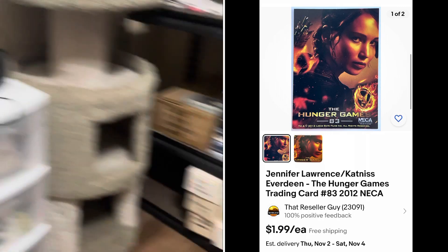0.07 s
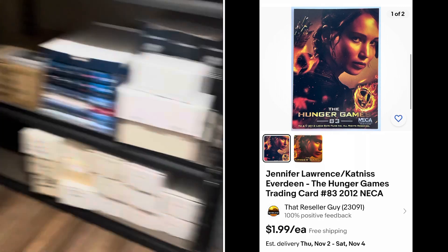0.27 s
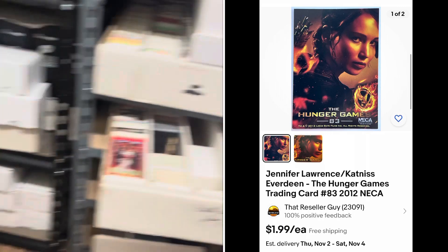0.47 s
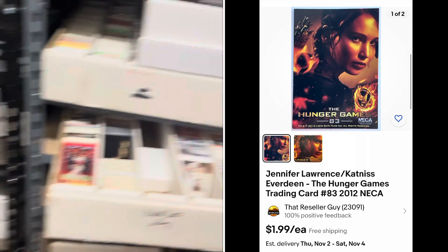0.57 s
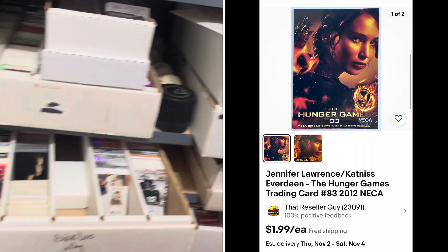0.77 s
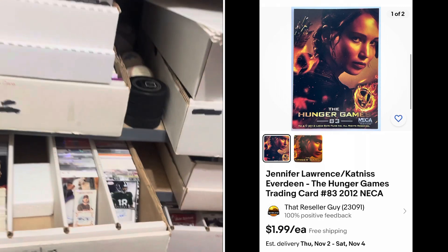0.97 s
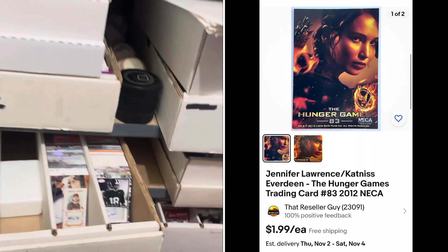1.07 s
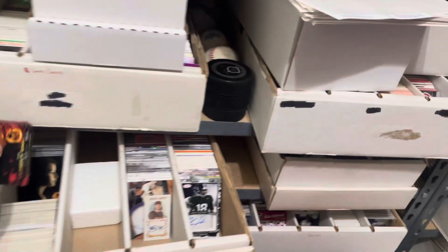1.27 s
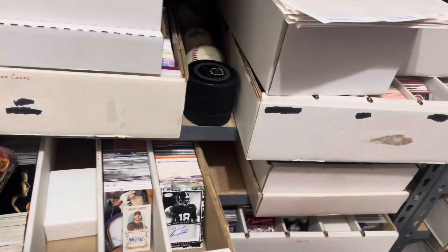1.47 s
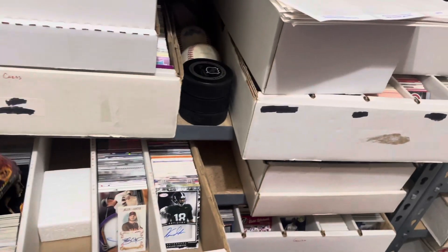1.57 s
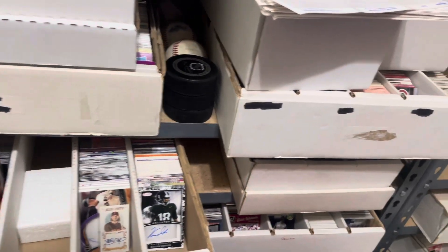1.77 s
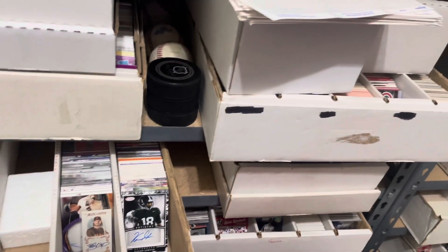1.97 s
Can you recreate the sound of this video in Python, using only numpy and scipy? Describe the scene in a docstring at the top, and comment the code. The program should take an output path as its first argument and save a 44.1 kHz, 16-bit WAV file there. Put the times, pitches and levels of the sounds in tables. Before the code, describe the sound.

A swivel office chair rolls across a hard floor, squeaking faintly, before a loud close knock.

```python
"""A small room with a hard floor: a swivel office chair is pushed off and rolls, its casters made of dense
tiny impacts that rumble, rattle, scrape and bump. A low squeak near 480 Hz, a wavering sine, comes and goes
as it slows. Something slides with a rising rustle of grainy noise and a tick, among soft handling taps; then
a hard object knocks down close to the microphone, ringing modes and noise bursts, and overloads it.
Room tone and a thin hiss, both shaped noise, lie behind."""
import sys
import numpy as np
from scipy import signal
from scipy.fft import rfft, irfft, next_fast_len
from scipy.io import wavfile
from scipy.ndimage import uniform_filter1d, minimum_filter1d, map_coordinates

SR = 44100
rng = np.random.default_rng(int(sys.argv[2]) if len(sys.argv) > 2 else 0)


def store_wav(level_fs):
    """Save 16-bit WAV to argv[1]."""
    pcm = np.round(np.clip(np.atleast_2d(level_fs), -1, 1) * 32767)
    wavfile.write(sys.argv[1], SR, pcm.T.astype(np.int16))


N = 88640  # samples

PATCHY_DB = 3  # rms depth of the flicker in the rattle and the scrape


def amp(db):
    """Decibels to gain."""
    return 10 ** (np.asarray(db) / 20)


def unit(x):
    """Scale to rms 1."""
    return x / np.sqrt(np.mean(x ** 2) + 1e-20)


def clock():
    """Time of each sample in seconds."""
    return np.arange(N) / SR


def along(points, hz):
    """Read (Hz, value) points at hz, on a log frequency axis."""
    point_hz, values = np.transpose(points)
    return np.interp(np.log(hz + 1), np.log(point_hz + 1), values)


def level(rows):
    """Gain per sample from (s, dB) rows."""
    return amp(np.interp(clock(), *np.transpose(rows)))


def wobble(rate):
    """A smooth random curve with rate knots a second."""
    knots = rng.standard_normal(int(N * rate / SR) + 4)
    return map_coordinates(knots, [clock() * rate])


def filtered(x, response):
    """x times a response of frequency."""
    size = next_fast_len(N + SR // 2)
    hz = np.fft.rfftfreq(size, 1 / SR)
    return irfft(rfft(x, size) * response(hz), size)[:N]


def coloured(x, spectrum):
    """x filtered by the given spectrum, at rms 1."""
    return unit(filtered(x, lambda hz: amp(along(spectrum, hz))))


def noise(spectrum):
    """Smooth coloured noise at rms 1."""
    return coloured(rng.standard_normal(N), spectrum)


def burst(s, attack, hold, t60):
    """Envelope from time s: linear attack, hold, exponential release."""
    t = clock() - s
    release = amp(-60 * np.maximum(t - attack - hold, 0) / t60)
    return np.clip(t / attack, 0, 1) * release


def mode(s, attack, hz, t60):
    """A decaying sine struck at time s."""
    return burst(s, attack, 0, t60) * np.sin(2 * np.pi * hz * (clock() - s))


def swell(s, length):
    """A rounded rise and fall."""
    return np.sin(np.pi * np.clip((clock() - s) / length, 0, 1))


def patchy(x, depth_db):
    """Make patches of time and frequency come and go at random."""
    z = signal.stft(x, nperseg=512)[2]
    field = rng.standard_normal(z.shape)
    field = uniform_filter1d(field, size=5, axis=0)  # over frequency bins
    field = uniform_filter1d(field, size=8, axis=1)  # over time frames
    return unit(signal.istft(z * amp(depth_db * unit(field)), nperseg=512)[1][:N])


def grains():
    """Rough contact as dense tiny impacts of uneven size."""
    grains_per_s, spread_db = 6000, 1.5
    size = amp(spread_db * np.minimum(rng.exponential(size=N), 4))
    hit = rng.random(N) < grains_per_s / SR
    return hit * size * rng.standard_normal(N)


def frame(x):
    """The chair's frame adds its resonances to what shakes it."""
    # frame resonances: centre_hz, width_hz, gain_db
    resonances = [(470,26,6),(935,12,2.5),(1730,170,-21)]

    def response(f):
        return 1 + sum(amp(db) * 1j * f * w / (c * c - f * f + 1j * f * w) for c, w, db in resonances)
    return filtered(x, response)


def casters():
    """Wheels run over the grain of the floor: a rumble, the floor's low drumming and a plastic rattle."""
    # rumble of the rolling: time_s, level_db (before the trim)
    roll_levels = [(.1,-61.5),(.22,-53.5),(.294,-40.5),(.35,-25),(.45,-25.5),(.572,-30.5),(.65,-29),(.72,-31.5),(.87,-36.5),(.92,-32.5),(.99,-36.5),(1.12,-36.5),(1.19,-41),(1.29,-38),(1.37,-51),(1.42,-43),(1.48,-46.5),(1.85,-54)]
    # rumble spectrum: freq_hz, relative density_db
    rumble_colour = [(30,-49),(70,-25),(115,-11.5),(165,0),(240,-4.5),(380,-4.5),(640,-6),(1000,-10),(1500,-24.5),(3000,-49.5)]
    # drumming of the floor under the wheels: time_s, level_db
    drum_levels = [(.15,-75),(.28,-51),(.36,-38),(.65,-47.5),(.82,-46),(1.12,-44),(1.42,-45.5),(1.58,-46),(1.8,-59.5),(2,-60)]
    # drumming spectrum: freq_hz, relative density_db
    drum_colour = [(25,-28),(50,-16),(70,-8.5),(100,13),(125,-3.5),(170,-13),(300,-35),(1000,-70)]
    # caster rattle: time_s, level_db (before the trim)
    rattle_levels = [(.2,-58),(.3,-47.5),(.385,-34.5),(.40,-27.5),(.44,-29.5),(.485,-27.5),(.54,-31),(.565,-28.5),(.64,-30.5),(.672,-25.5),(.705,-31.5),(.74,-41),(.85,-46),(.97,-45.5),(1.15,-52),(1.65,-52.5),(1.8,-65)]
    # rattle spectrum: freq_hz, relative density_db
    rattle_colour = [(200,-18),(800,-0.5),(1500,4.5),(1950,10.5),(2350,0.5),(2650,2.5),(3000,-4.5),(3400,0.5),(4000,-11),(5200,-12),(7000,-25.5),(12000,-39)]
    roll_trim_db, rattle_trim_db = -2.5, -1

    # both levels waver: depth in dB, knots a second
    roll_gain = level(roll_levels) * amp(roll_trim_db + 1.47 * wobble(29.23))
    rumble = roll_gain * coloured(frame(grains()), rumble_colour)
    drum = level(drum_levels) * noise(drum_colour)
    rattle_gain = level(rattle_levels) * amp(rattle_trim_db + .8 * wobble(68.3))
    rattle = rattle_gain * patchy(coloured(frame(grains()), rattle_colour), PATCHY_DB)
    return rumble + drum + rattle


def scrape():
    """The casters drag sideways as they swing round after the push, before they line up."""
    # scrape: time_s, level_db
    scrape_levels = [(.36,-80),(.385,-42),(.397,-27.5),(.43,-35.5),(.455,-26.5),(.485,-34.5),(.52,-43),(.58,-53),(.7,-47),(.8,-82)]
    # scrape spectrum: freq_hz, relative density_db
    scrape_colour = [(500,-34),(1500,10.5),(2000,-9),(3000,5),(4500,-2.5),(6000,-13),(7500,-26),(12000,-47)]
    return level(scrape_levels) * patchy(coloured(grains(), scrape_colour), PATCHY_DB)


def bumps():
    """Each jolt rings the chair, thuds through the frame and shakes the loose casters."""
    # caster bumps: start_s, attack_s, thud_db, rattle_db
    jolts = [(.348,0.0023,-24,-46),(.372,0.0033,-33.5,-49),(0.893,0.0082,-36,-32.5),(1.105,0.0051,-38,-50),(1.208,0.0015,-43,-37),(1.299,0.00087,-39,-49.5),(1.326,0.0038,-49,-46),(1.395,0.016,-42,-48.5)]
    # what a jolt rings in the chair: freq_hz, level_db (relative to the jolt), t60_s
    jolt_modes = [(130,-2,0.17),(173,-3,0.12),(371,-8,0.07),(702,-14,0.038)]
    # thud spectrum: freq_hz, relative density_db
    thud_colour = [(30,-40),(70,-41),(130,0.5),(250,-5.5),(500,-2),(1000,-12),(2500,-52.5)]
    # spectrum of the shaken casters: freq_hz, relative density_db
    clatter_colour = [(200,-5),(850,0),(1400,-1),(2150,1.5),(2500,-11.5),(3400,-17),(5000,-17),(7000,-28),(14000,-45)]
    ring_over_thud_db, hold_s, t60_s = 0.5, 0.013, 0.13

    thud = coloured(frame(grains()), thud_colour)
    clatter = coloured(frame(grains()), clatter_colour)
    out = np.zeros(N)
    for s, attack, thud_db, rattle_db in jolts:
        ring = sum(amp(db) * mode(s, attack, hz, t60) for hz, db, t60 in jolt_modes)
        shaken = amp(thud_db) * thud + amp(rattle_db) * clatter
        out += amp(thud_db + ring_over_thud_db) * ring
        out += burst(s, attack, hold_s, t60_s) * shaken
    return out


def squeak():
    """A rubbing bearing sings in short wavering swells."""
    # swells of the squeak: start_s, length_s, pitch_hz (mean), level_db (before the trim)
    squeak_swells = [(0.312,0.026,475,-32),(.345,0.021,490,-23.5),(0.408,0.026,495,-24.5),(0.483,0.056,490,-27.5),(0.546,0.075,485,-31.5),(0.599,0.078,492,-24.5),(0.678,0.078,462,-25.5),(0.72,0.072,485,-30),(0.781,0.092,490,-39.5),(0.882,0.058,482,-28.5),(1.034,0.14,482,-33),(1.218,0.049,486,-31),(1.3,0.022,472,-28.5),(1.391,0.043,464,-36)]
    pitch_waver = 0.0116  # fraction of the pitch
    rough_db, trim_db = 1.4, -1
    swell_power = 0.73  # below 1 rounds the swell out fuller

    out = np.zeros(N)
    for s, length, hz, db in squeak_swells:
        pitch = hz * (1 + pitch_waver * wobble(90))
        phase = 2 * np.pi * np.cumsum(pitch) / SR
        shape = np.abs(swell(s, length)) ** swell_power
        out += amp(db) * shape * np.sqrt(2) * np.sin(phase)
    return out * amp(trim_db + rough_db * wobble(150))


def knock():
    """A hard object lands in quick contacts; each rings its modes, dense body and a crack, with little bass."""
    # contacts of the knock: start_s, ring_db, body_db, crack_db
    contacts = [(1.9081,-15.5,-8,-25),(1.9207,-16.5,-9,-36),(1.931,-16.5,-8,-7),(1.9358,-13,-12.5,-14)]
    # what the knocked object rings with: freq_hz, relative level_db (before scatter), t60_s
    knock_modes = [(236,-4,0.096),(301,-4.5,0.13),(360.2,-5.5,0.15),(424,-12,0.061),(566,-6,0.081),(624.5,-8,0.14),(656,-6.5,0.16),(786,-5,0.09),(880,-7.5,.12),(1105,1.5,0.18),(1177,-3,0.17),(1217,2,0.1),(1264,-1.5,0.075),(1414,-4.5,0.096),(1617,-12,0.17),(1857,-8.5,0.088),(2050,-7.5,0.14),(2430,-14,0.17),(2524,-15,.2),(2860,-16,0.21),(3336,-12,0.18),(3590,-25,.18),(4160,-20,0.24)]
    # body spectrum: freq_hz, relative density_db
    body_colour = [(40,-40),(110,-28),(220,-0.5),(550,2),(900,-8),(1220,5.5),(1600,-1.5),(2000,-4.5),(2250,-35),(2800,-8),(4500,-16.5),(7000,-27.5),(14000,-51)]
    # crack spectrum: freq_hz, relative density_db
    crack_colour = [(300,-11),(1500,6.5),(2250,1),(2800,1),(3500,-4.5),(5000,-7),(7000,-17),(10000,-36),(15000,-33)]
    attack_s, body_t60_s = .0008, 0.1
    crack_attack_s, crack_hold_s, crack_t60_s = .002, 0.0016, 0.028
    scatter_db, low_cut_hz = 1, 159

    out = np.zeros(N)
    for s, ring_db, body_db, crack_db in contacts:
        ring = np.zeros(N)
        for hz, db, t60 in knock_modes:
            ring += amp(db + rng.normal(0, scatter_db)) * mode(s, attack_s, hz, t60)
        body = burst(s, attack_s, 0, body_t60_s) * noise(body_colour)
        crack = burst(s, crack_attack_s, crack_hold_s, crack_t60_s) * noise(crack_colour)
        out += amp(ring_db) * ring + amp(body_db) * body + amp(crack_db) * crack
    low_cut = signal.butter(N=4, Wn=low_cut_hz, btype="high", fs=SR, output="sos")
    return signal.sosfilt(low_cut, out)


def rustle():
    """Light sliding friction, grains over smooth noise, and one bright tick."""
    # sliding rustle: time_s, level_db
    rustle_levels = [(0,-95),(.05,-58),(.085,-48.5),(.13,-55),(.3,-63),(1.66,-64),(1.715,-42),(1.8,-40.5),(1.86,-35.5),(1.91,-34.5),(1.96,-39)]
    # rustle spectrum: freq_hz, relative density_db
    rustle_colour = [(100,-44),(300,2),(550,-9),(1200,-1),(2000,-6.5),(4100,-3),(7000,-15),(15000,-31.5)]
    # the tick: start_s, peak_db, t60_s
    s, peak_db, t60 = (1.6995,-24,0.003)
    # tick spectrum: freq_hz, relative density_db
    tick_colour = [(1000,-35),(3800,-15.5),(5000,-1.5),(8300,1),(9800,-19),(16000,-19)]

    tick = burst(s, .0003, .0005, t60) * noise(tick_colour)
    slide = coloured(grains() + 0.44 * rng.standard_normal(N), rustle_colour)
    return level(rustle_levels) * slide + amp(peak_db) * tick / np.abs(tick).max()


def taps():
    """Soft, dull contacts as something is handled: short bursts of coloured noise."""
    # light handling taps: start_s, level_db
    contacts = [(1.683,-39),(1.746,-34.5)]
    # tap spectrum: freq_hz, relative density_db
    tap_colour = [(60,-20),(200,2),(320,4.5),(600,-4),(1250,0),(2000,-8.5),(2750,-0.5),(3600,-15),(6000,-22),(12000,-38)]
    attack_s, hold_s, t60_s = 0.0016, 0.0095, 0.12
    envelope = sum(amp(db) * burst(s, attack_s, hold_s, t60_s) for s, db in contacts)
    return noise(tap_colour) * envelope


def in_room(x, wet_db):
    """x plus the small room's diffuse tail, noise that dies away at its own rate in each band."""
    # room decay: freq_hz, t60_s
    room_decay = [(150,0.33),(1500,0.36),(4000,0.5),(10000,0.084)]
    hz, t, z = signal.stft(rng.standard_normal(SR // 2), SR, nperseg=256)
    decay = amp(-60 * t / along(room_decay, hz)[:, None])
    tail = signal.istft(z * decay, SR, nperseg=256)[1]
    delay = np.zeros(SR // 250)  # 4 ms before the tail starts
    tail = np.concatenate([delay, tail / np.linalg.norm(tail)])
    return x + amp(wet_db) * signal.fftconvolve(x, tail)[:N]


def background():
    """Steady room tone and a thin high hiss that swells twice, both coloured noise."""
    # room tone spectrum: freq_hz, relative density_db
    tone_colour = [(25,-7),(100,3),(190,2),(300,0.5),(700,-16.5),(2000,-20),(2600,-8.5),(5000,-2),(7500,-11),(10000,-12.5),(15000,-21.5)]
    # hiss spectrum: freq_hz, relative density_db
    hiss_colour = [(2000,-1.5),(4800,2),(7500,-8.5),(9000,-7),(10000,0.5),(11500,-13.5),(15000,-16)]
    # swells of the hiss: start_s, length_s, level_db (at the crest)
    hiss_swells = [(.6,0.64,-48.5),(1.3,0.41,-51.5)]
    tone_db = -51.5
    hiss_gain = sum(amp(db) * swell(s, length) for s, length, db in hiss_swells)
    return amp(tone_db) * noise(tone_colour) + noise(hiss_colour) * hiss_gain


def scene():
    """Chair and knock in the room, one channel; squeak, rustle and taps are heard without the tail."""
    chair = in_room(casters() + scrape() + bumps(), -10.5) + squeak()  # tail level in dB
    fall = in_room(knock(), -12.5)
    return (chair + fall + rustle() + taps() + background())[None]


def record(dry):
    """A fast limiter catches most of the overload, the rest clips; nothing is kept above the band limit."""
    limit_db, hold_s = 4.5, .003  # limit relative to full scale
    clip_top, top_hz = 1.0, 15700
    size = int(hold_s * SR)
    needed = 1 / np.maximum(np.abs(dry[0]) / amp(limit_db), 1)
    gain = uniform_filter1d(minimum_filter1d(needed, size), size)
    clipped = np.clip(dry[0] * gain, -clip_top, clip_top)
    return filtered(clipped, lambda hz: hz < top_hz)[None]


dry = scene()
out = record(dry)
store_wav(out)
```